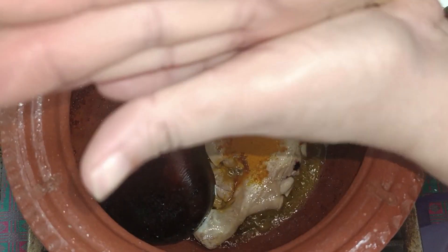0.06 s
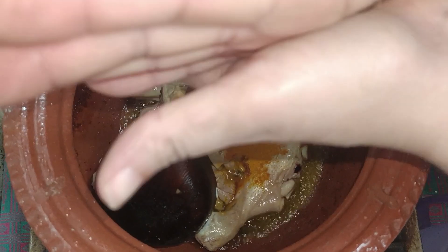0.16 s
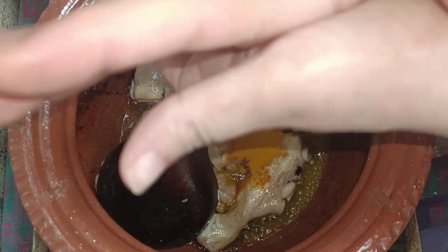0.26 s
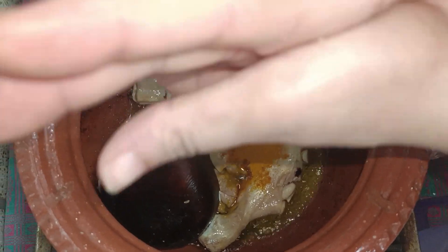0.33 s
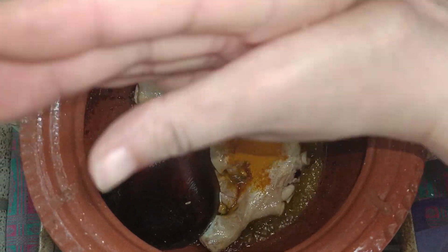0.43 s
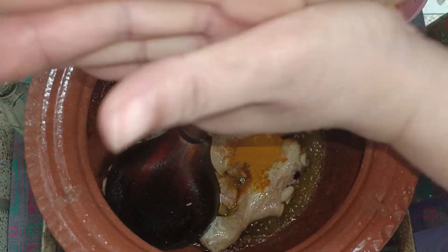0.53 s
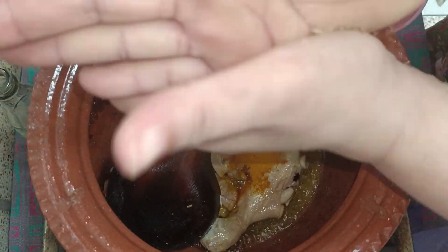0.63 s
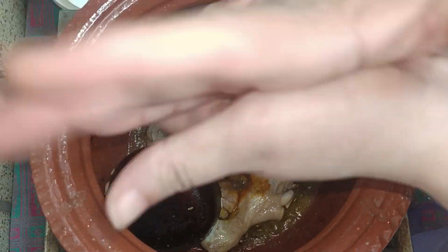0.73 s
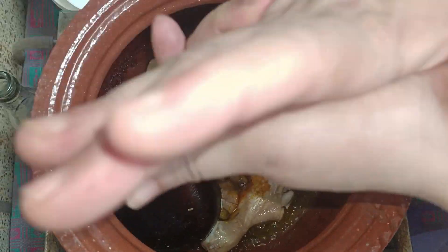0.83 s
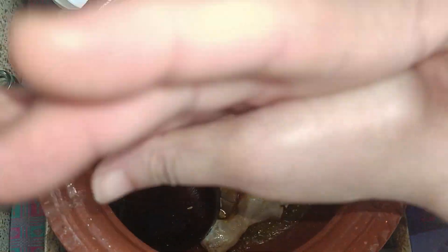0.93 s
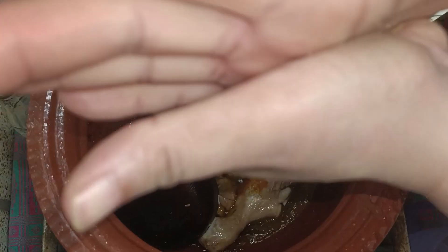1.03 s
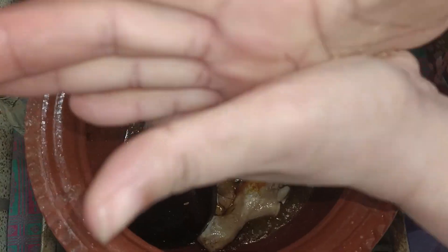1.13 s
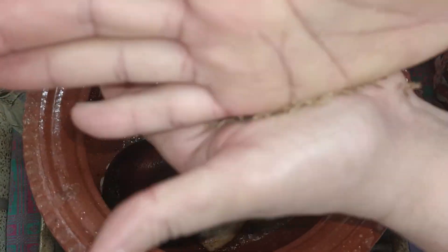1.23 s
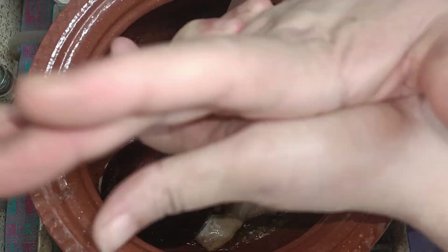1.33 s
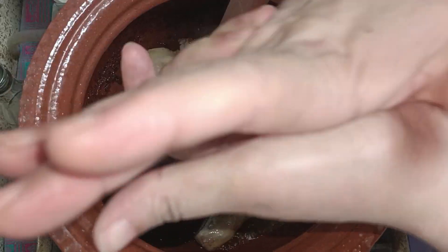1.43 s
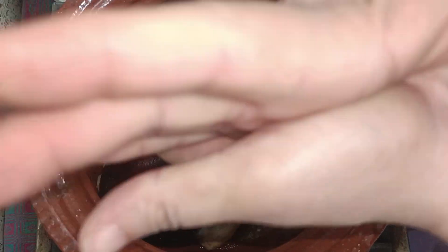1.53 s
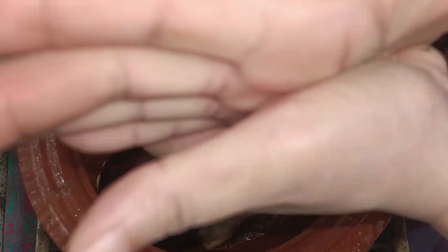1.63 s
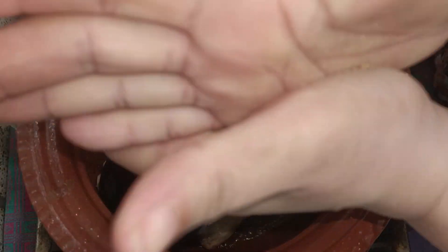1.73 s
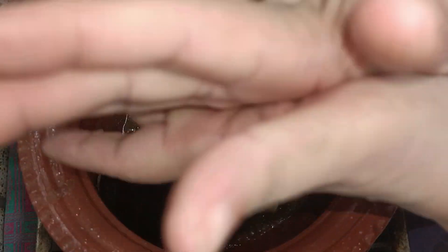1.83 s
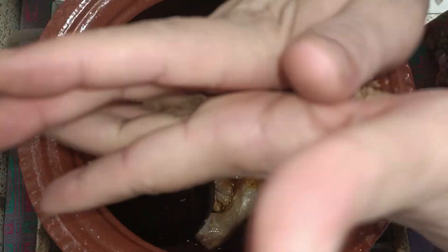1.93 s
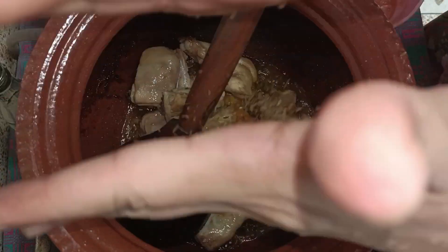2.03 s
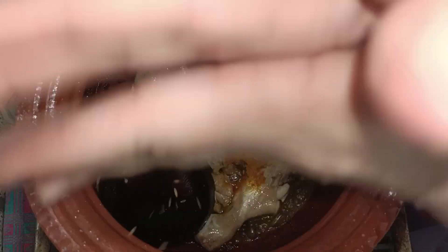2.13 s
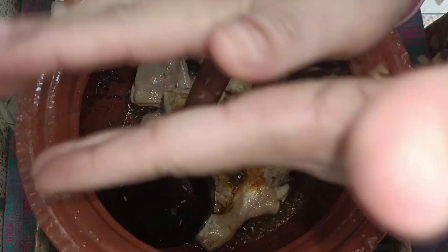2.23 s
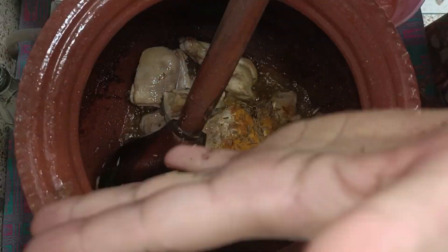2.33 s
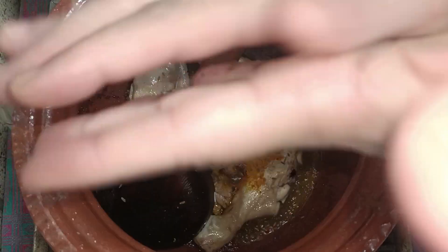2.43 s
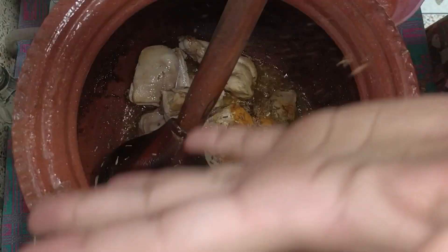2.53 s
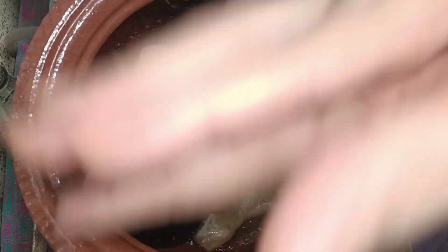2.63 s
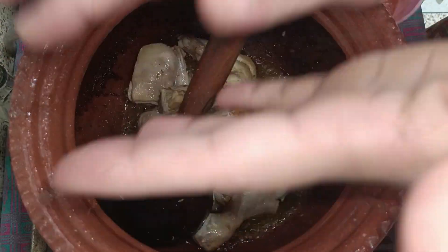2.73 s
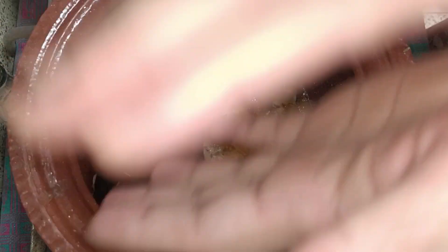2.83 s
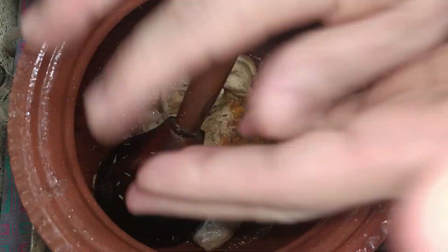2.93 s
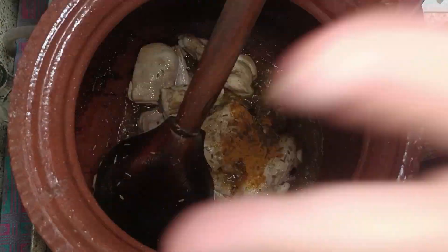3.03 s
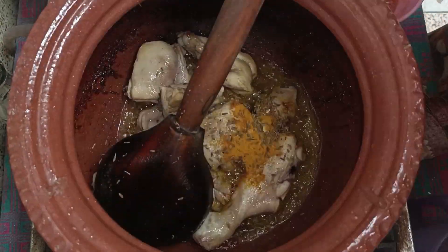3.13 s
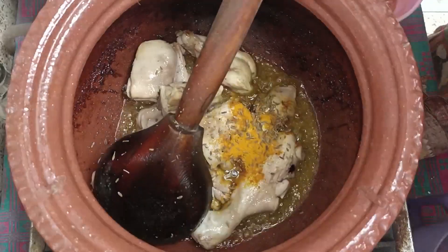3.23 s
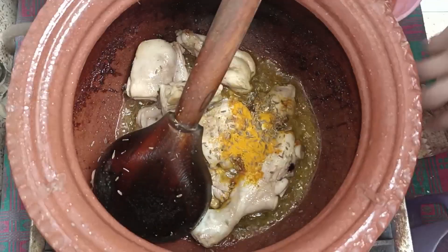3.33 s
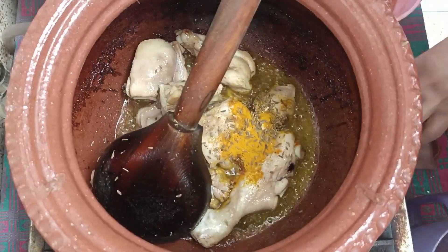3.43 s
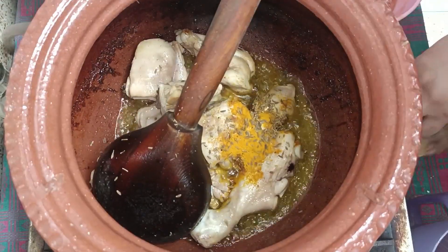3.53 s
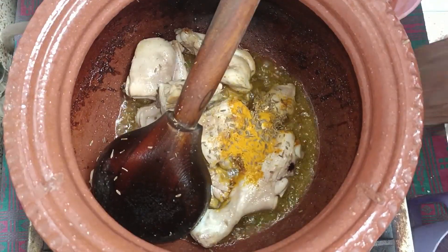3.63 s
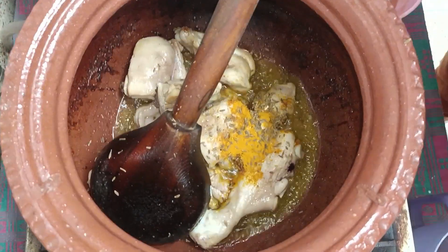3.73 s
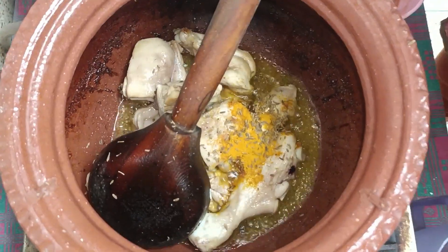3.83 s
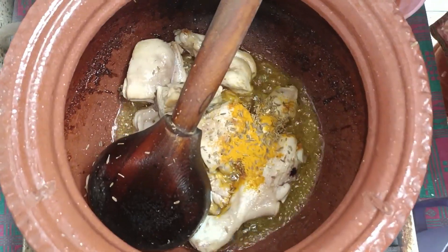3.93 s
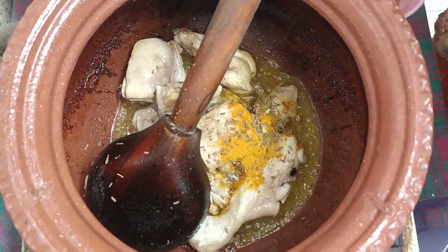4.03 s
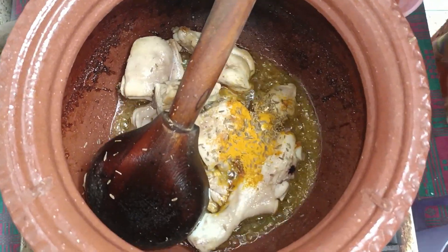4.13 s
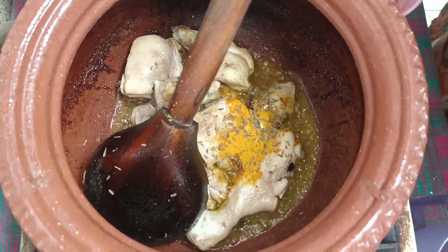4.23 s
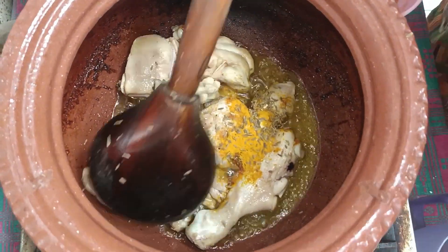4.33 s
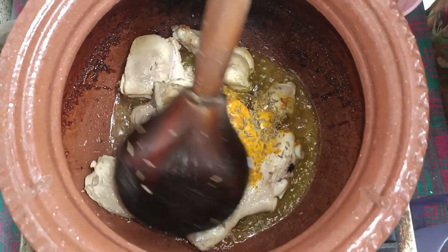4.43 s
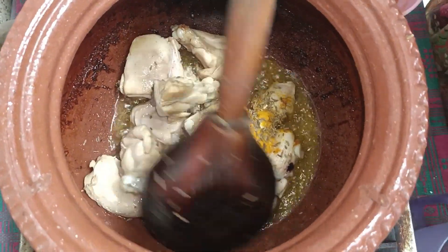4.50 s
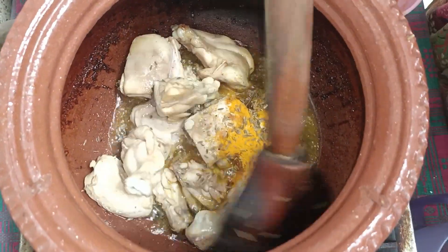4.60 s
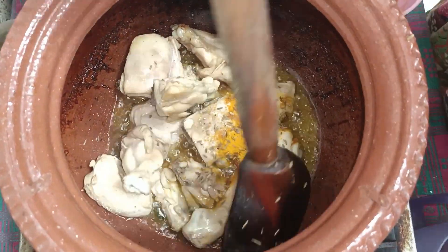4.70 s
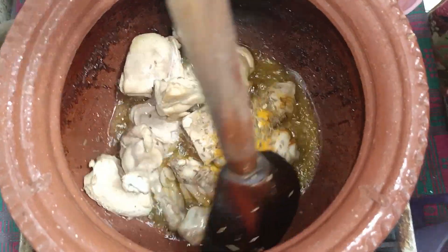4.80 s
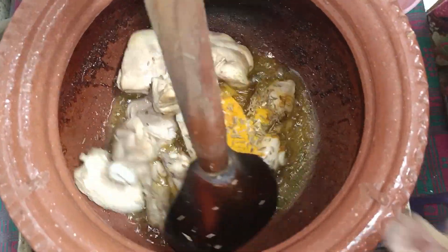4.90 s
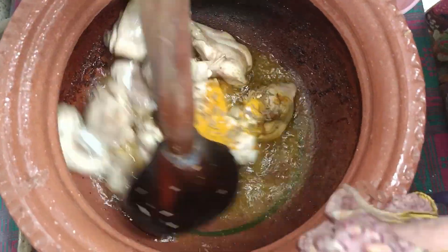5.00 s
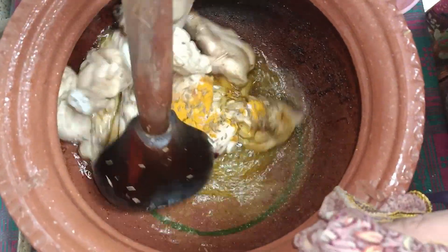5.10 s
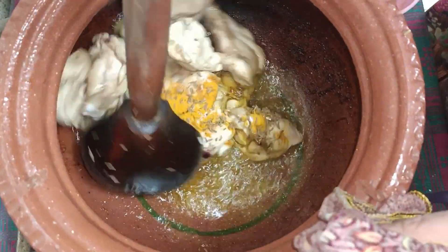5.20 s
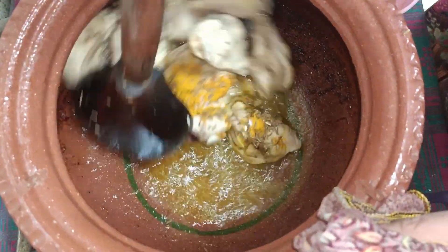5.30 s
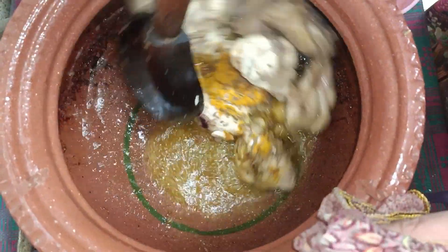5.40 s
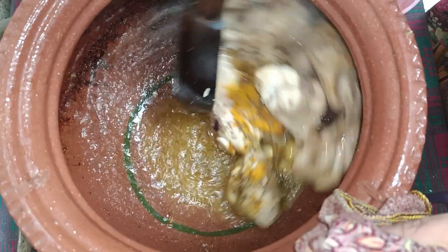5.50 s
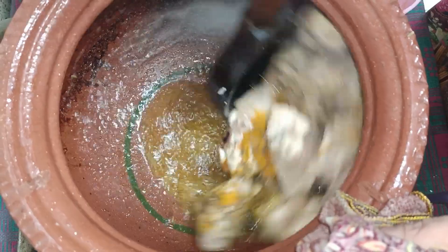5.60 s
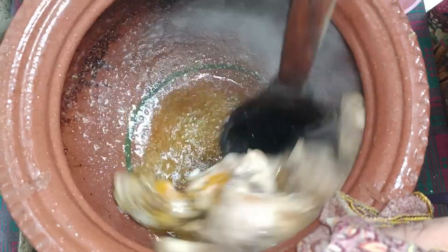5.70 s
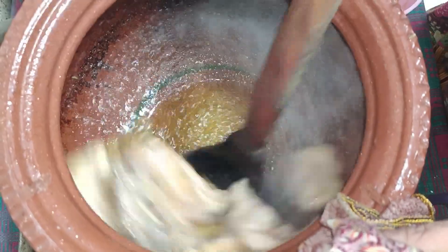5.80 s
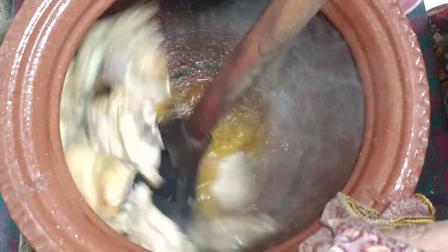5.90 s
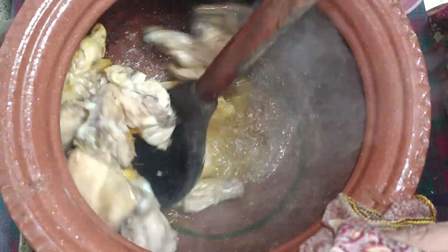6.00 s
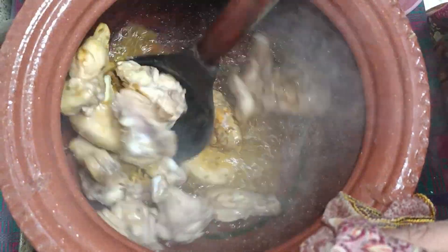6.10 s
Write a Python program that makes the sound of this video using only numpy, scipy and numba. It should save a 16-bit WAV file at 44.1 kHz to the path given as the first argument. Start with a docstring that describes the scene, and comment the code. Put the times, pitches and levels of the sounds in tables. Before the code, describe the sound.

A moderate, grainy sizzle simmers in a resonant clay pot in a quiet kitchen, with pops of fat and soft gurgling. Midway come a crisp slap of palms and a stronger one with a short echo. After a pause of plain frying, a spoon clonks on the pot, drags grittily along its wall, and the sizzle swells to a harsh, spraying hiss. Close stereo phone pickup.

```python
"""Meat sizzles in hot fat in a deep clay pot: random bubble bursts drive noise through the pot's air resonances,
with single spits, thin cracks and a low gurgle on top. Hands dust spice off above it in slaps of damped sines and puffs.
A wooden spoon then knocks the clay (ringing modes), scrapes it (swept noise) and rocks the pot, and the fat flares up
on the bared floor. Filtered noise makes the quiet kitchen; all of it is heard by a phone with two microphones."""
import sys
import numpy as np
from scipy import signal
from scipy.fft import rfft, irfft, next_fast_len
from scipy.io import wavfile
from scipy.ndimage import uniform_filter1d
from numba import njit

SR = 44100
rng = np.random.default_rng(int(sys.argv[2]) if len(sys.argv) > 2 else 0)


def generate_wav(signal):
    """Clip the signal to [-1, 1] and save it as 16-bit WAV at the path in sys.argv[1]."""
    frames = np.transpose(np.atleast_2d(signal))
    scaled = np.clip(frames, -1, 1) * 32767
    pcm = np.round(scaled).astype(np.int16)
    wavfile.write(sys.argv[1], SR, pcm)


def field_ratio(decibels):
    """Amplitude ratio for a level in dB (20 dB per decade); scalars and array-likes work."""
    return 10 ** (np.asarray(decibels, dtype=float) / 20)


N = 271215
T = np.arange(N) / SR


def curves(table):
    """Columns of a table against its first one, time, as one value a sample."""
    s, *columns = np.transpose(table)
    return [np.interp(T, s, c) for c in columns]


def unit(x):
    """Scaled to rms 1."""
    return x / np.sqrt(np.mean(x ** 2))


def pan(db):
    """Left and right gains for a left minus right level difference."""
    return field_ratio(np.array([db, -db]).reshape(2, -1) / 2)


def above(x, hz):
    """Steep high-pass."""
    return signal.sosfilt(signal.butter(4, hz, "highpass", fs=SR, output="sos"), x)


def ring(x, hz, width):
    """A resonance applied twice, so the valleys beside it stay dark."""
    b, a = signal.iirpeak(hz, hz / width, SR)
    return signal.lfilter(b, a, signal.lfilter(b, a, x))


@njit
def sweep(x, hz, width):
    """State-variable band-pass whose centre moves."""
    y, band, low = np.empty(len(x)), 0., 0.
    for i in range(len(x)):
        g = np.tan(np.pi * hz[i] / SR)
        k = width / hz[i]
        v = (band + g * (x[i] - low)) / (1 + g * (g + k))
        band = 2 * v - band
        low = low + 2 * g * v
        y[i] = k * v
    return y


def walk(rate):
    """Random levels held 1 / rate s and slewed twice; spread 1."""
    k = int(SR / rate)
    held = np.repeat(rng.standard_normal(N // k + 1), k)
    return unit(uniform_filter1d(uniform_filter1d(held, k), k)[:N])


def fade(power, ms):
    """Each spike of power dies away exponentially, by a factor e in ms."""
    return signal.lfilter([1], [1, -np.exp(-1000 / (ms * SR))], power)


def bursts(rate, spread_db, ms):
    """Power of bubbles bursting at random, rate a second, many small and a few large; mean 1."""
    when, size = rng.random(N), rng.exponential(size=N)
    strength = field_ratio(np.minimum(spread_db * size, 17)) ** 2
    power = fade((when < rate / SR) * strength, ms)
    return power / power.mean()


def decay(s, hz, t60):
    """A damped sine from time s that builds up over its first cycle."""
    t = np.clip(T - s, 0, None)
    return np.sin(2 * np.pi * hz * t) * (1 - np.exp(-2 * hz * t)) * np.exp(-np.log(1000) * t / t60)


def swells(table):
    """Amplitude of sounds that rise, hold for their length and die away."""
    attack_s, release_db_per_s = 0.0075, 400
    power = 0
    for s, length, db, *_ in table:
        rise = np.clip((T - s) / attack_s, 0, 1)
        fall_db = release_db_per_s * np.clip(T - s - length, 0, 1)
        power = power + (rise * field_ratio(db - fall_db)) ** 2
    return np.sqrt(power)


# Air resonances of pot and phone. Each row: centre in Hz, width of one pass in Hz, gain in dB for the simmer,
# gain in dB for the flare, left minus right in dB, likeness of the two microphones from 0 to 1.
POT_AIR = [(1325, 290, -19, 0.5, -1.5, 0.53), (1745, 191, 3, 1, -2, 0.75), (2090, 550, -10.5, 0, -8, 0.37),
           (2500, 544, 1, 1.5, 3, 0.7), (2820, 1310, -2, -2, 2.5, 0), (3367, 300, -7, -1.5, -9, 0),
           (3940, 690, 1, 1.5, 0.5, 0), (4458, 850, -1, -0.5, 9, 0.24), (5394, 1570, -11, -4.5, 3.5, 0.11),
           (6630, 1700, -20, -10.5, -2, 0.08), (7910, 2270, -17.5, -5, -8.5, 0),
           (10380, 2270, -24.5, -10.5, 12.5, 0), (12650, 5300, -25, -8.5, 3.5, 0),
           (14670, 3100, -23, -5, 4.5, 0)]
# Steady frying; the deep note fades once the spoon is lifted. Each row: time in seconds, level in dB,
# deep pot note in dB (added to the resonances under 1900 Hz).
SIMMER = [(0, -39, -5), (.5, -41, -1), (1.1, -41.5, -8.5), (1.7, -42, -3.5), (2.3, -41, -3),
          (2.9, -41.5, -2.5), (3.6, -39.5, -1.5), (4.4, -39.5, 1), (4.7, -39, -16), (4.95, -39.5, -12)]


def frying():
    """Bursting bubbles excite the air of the pot; each resonance hears broad cracks and bubbles of its own."""
    simmer_db, deep_db = curves(SIMMER)
    deep_db = deep_db + 2.27 * walk(6.96)
    # hands over the pot shade the treble from the right microphone, then move off
    hands_off_s = 3.2
    shade_db = np.interp(T, [hands_off_s - 0.15, hands_off_s + 0.14], [4.5, 0.5])
    spray_db, coarse_db = flare()
    broad = bursts(rate=150, spread_db=3.2, ms=1.2)
    thin = fade(cracks(), 0.61)
    s, spit_db, spit_hz, spit_pan = spits(np.maximum(simmer_db, coarse_db))
    out = 0
    for hz, width, calm_db, hot_db, pan_db, like in POT_AIR:
        treble = np.clip(np.log2(hz / 4830), 0, 1)
        share = 0.15 + 0.21 * treble
        grain = share * broad + (1 - share) * bursts(rate=900, spread_db=1, ms=3.3)
        calm = field_ratio(simmer_db + calm_db + (hz < 1900) * deep_db + 1.47 * walk(27.996)) ** 2 * grain
        # the flare is so dense that its grains partly merge into hiss
        flare_db = treble * spray_db + (1 - treble) * coarse_db
        hot = field_ratio(flare_db + hot_db + 1.62 * walk(12)) ** 2 * (0.42 + 0.35 * grain)
        # a spit is loudest in the resonances near its pitch
        near_db = np.maximum(-14 * np.log2(hz / spit_hz) ** 2, -12)
        spit = np.zeros((2, N))
        spit[:, (s * SR).astype(int)] = (field_ratio(spit_db + calm_db + near_db) * pan(spit_pan)) ** 2
        power = (calm + hot) * pan(pan_db + treble * shade_db) ** 2 + fade(spit, 3.85)
        power = power + treble * thin * (field_ratio(calm_db) * pan(pan_db)) ** 2
        both, left, right = rng.standard_normal((3, N))
        noise = np.sqrt(like) * both + np.sqrt(1 - like) * np.array([left, right])
        # food and spoon shift a little, so every resonance wavers
        centre_hz = hz + 30 * walk(7)
        rung = [sweep(sweep(x, centre_hz, width), centre_hz, width) for x in noise * np.sqrt(power)]
        out = out + np.array(rung) * np.sqrt(SR / 1500)
    return floor_echo(out)


def floor_echo(sizzle):
    """The echo from the pot floor thins two neighbouring wavering bands, ever less from 4.2 to 4.9 s."""
    depth = np.clip(5.1 - T, 0.2, 0.9)
    for hz in (1960, 2110):
        notch_hz = hz * (1 + 0.047 * walk(25.05))
        sizzle = sizzle - depth * np.array([sweep(x, notch_hz, 295.0) for x in sizzle])
    return sizzle


# Colour of the room noise. Each row: frequency in Hz, relative density in dB per Hz.
KITCHEN_COLOUR = [(12, -53), (20, -29), (69, -12), (136, -2.5), (237, -3), (270, -6), (303, -4.5),
                  (406, -1.5), (448, 3.5), (495, -6.5), (892, -14), (1000, -21), (1300, -40), (2200, -120)]
# Its balance. Each row: frequency in Hz, left minus right in dB.
KITCHEN_PAN = [(40, 3), (150, -1.5), (430, 3.5), (600, -4.5), (800, -7)]


def kitchen():
    """Low room noise and burner roar, nearly the same on both microphones in the bass."""
    size = next_fast_len(N)
    hz = np.maximum(np.fft.rfftfreq(size, 1 / SR), 1)
    colour_db, pan_db = (np.interp(np.log(hz), np.log(np.array(t)[:, 0]), np.array(t)[:, 1])
                         for t in (KITCHEN_COLOUR, KITCHEN_PAN))
    both, left, right = rfft(rng.standard_normal((3, size)), axis=1)
    apart = np.clip(hz / 610, 0.3, 3)
    air = (both + apart * np.array([left, right])) / np.sqrt(1 + apart ** 2)
    roar = irfft(air * field_ratio(colour_db) * pan(pan_db), size)[:, :N]
    return unit(roar) * field_ratio(-64 + 0.99 * walk(5.22))


# Runs of large bubbles under the spoon bowl. Each row: start in seconds, length in seconds, level in dB.
GURGLES = [(.02, 0.31, -57), (.55, 0.2, -56.5), (3.84, 0.069, -57.5), (4.0, 0.054, -51.5), (4.42, 0.2, -55)]


def gurgle():
    """Large bubbles ring one low hollow of the pot, heard somewhat more on the right."""
    bubbles = rng.standard_normal((2, N)) * np.sqrt(bursts(rate=150, spread_db=3, ms=5))
    idle = field_ratio(-69.5)
    under_flare = field_ratio(flare()[1] - 10.5)  # follows the coarse sizzle
    return unit(ring(bubbles, 1098.5, 68)) * (idle + swells(GURGLES) + under_flare) * pan(-5)


# Single spits of fat. Each row: time in seconds, level in dB before the pot's air, pitch in Hz,
# left minus right in dB.
SPITS = [(0.2753, -29.5, 2500, -2), (.29, -34, 1600, -6), (.3735, -33.5, 4060, -2), (0.682, -36, 4380, 12),
         (1.289, -35, 4500, 11), (2.1784, -31.5, 2400, 7), (2.6683, -33.5, 2500, 0), (2.909, -30, 4450, 5),
         (2.9886, -35, 4270, 6), (3.6022, -33, 4350, -5), (4.2163, -30.5, 4350, 0),
         (4.366, -33.5, 2530, -4), (5.0842, -28, 2550, -3), (5.1134, -22, 1880, -4)]


def spits(frying_db):
    """Single spits of fat, and 24 more at random times whose level follows the frying."""
    count = 24
    at = rng.integers(0, N, count)
    level_db = frying_db[at] - 1.5 + 6 * (rng.random(count) - 0.5)
    pitch_hz = rng.choice([2500, 4340], count)
    pan_db = 3 + 14 * (rng.random(count) - 0.5)
    return np.hstack([np.transpose(SPITS), [at / SR, level_db, pitch_hz, pan_db]])


# Thin treble cracks: spraying fat, and the sharp edge of the two hand slaps at 2.465 and 2.7176 s.
# Each row: time in seconds, level in dB before the pot's air.
CRACKS = [(.3711, -27), (1.034, -27), (1.4194, -26), (1.695, -25), (2.465, -24), (2.7176, -18.5),
          (2.831, -33), (2.9307, -23), (3.018, -23.5), (3.6026, -27), (3.7105, -22), (4.276, -19.5),
          (4.8688, -25), (4.9561, -22), (5.0529, -19)]


def cracks():
    """Single spikes of power for thin treble cracks: 16 at random times and the listed ones."""
    count, power = 16, np.zeros(N)
    random_db = -37.5 + 9.7 * (rng.random(count) + 0.5)
    power[rng.integers(0, N, count)] = field_ratio(random_db) ** 2
    s, db = np.transpose(CRACKS)
    power[(s * SR).astype(int)] = field_ratio(db) ** 2
    return power


# Palms and fingers meeting. Each row: time in seconds, skin level in dB, hollow level in dB.
SLAPS = [(2.4622, -19, -51), (2.465, -8.5, -39), (2.7146, -9.5, -23), (2.7154, -11, -14.5),
         (2.7181, -9, -3.5)]
# Modes of the skin. Each row: pitch in Hz, relative level in dB, t60 in ms, left minus right in dB.
PALMS = [(2020, -9, 6.4, -14.5), (2600, -4, 7.2, 3), (3200, -6.5, 8.4, 3), (3870, -7, 5.5, 10)]
# Dull puffs of air, most of them on the right. Each row: start in seconds, level in dB, pitch in Hz, t60 in ms,
# left minus right in dB.
PUFFS = [(2.17, -48, 80, 62, -22), (2.458, -45, 98.5, 100, -19), (2.463, -41, 237, 47, -18),
         (2.7128, -21, 182, 15, -20), (2.79, -52, 86.5, 200, -19), (4.562, -36.5, 101, 90, -8),
         (4.639, -39, 141, 82, -0.5)]


def hands():
    """Slaps of cupped palms with a short hollow echo from pot and kitchen, and the air they push."""
    lag = np.array([[0.00025], [0]])  # seconds; the left microphone is further from the hands
    skin, hollow, puffs = 0, 0, 0
    for s, skin_db, hollow_db in SLAPS:
        for hz, mode_db, ms, pan_db in PALMS:
            skin = skin + field_ratio(skin_db + mode_db) * pan(pan_db) * decay(s + lag, hz, ms / 1000)
        # air between the palms
        hollow = hollow + field_ratio(hollow_db) * pan(-7.5) * decay(s + lag, 970, 6.9 / 1000)
    slaps = above(skin, 1500) + hollow
    t = T[:SR // 4]
    echo = rng.standard_normal((2, len(t))) * np.exp(-(t / 0.055) ** 2) * (t > 0.004)
    tail = signal.fftconvolve(ring(slaps, 650, 900), echo, axes=1)[:, :N]
    for s, db, hz, ms, pan_db in PUFFS:
        puffs = puffs + field_ratio(db) * pan(pan_db) * decay(s, hz, ms / 1000)
    return above(slaps + field_ratio(-41) * tail, 370) + puffs


# Modes of the pot wall. Each row: pitch in Hz, relative level in dB, t60 in seconds.
CLAY = [(369.6, -5, 0.13), (457, -0.5, 0.058), (545, -12.5, 0.12), (718, -2, 0.16), (920, -32, 0.03),
        (1106, -17, 0.17), (1300, -2, 0.04), (1836, -3, 0.045), (2340, -1, .045), (2860, -4, .045)]


def clay(force):
    """The pot wall rings with its modes."""
    t = T[:SR // 2]
    body = sum(field_ratio(db) * np.sin(2 * np.pi * hz * t) * np.exp(-np.log(1000) * t / t60) for hz, db, t60 in CLAY)
    return signal.fftconvolve(force, body[None], axes=1)[:, :N]


# Spoon on clay. Each row: time in seconds, push on the clay in dB, contact in ms, spoon level in dB,
# left minus right in dB.
KNOCKS = [(4.6894, -23, 0.2, -36, 3), (4.701, -32.5, 0.24, -36, 13), (4.745, -39, 0.52, -50, 5),
          (5.102, -47, 0.31, -52, -10), (6.1246, -48, 0.22, -18, 2)]
# Modes of the wooden spoon. Each row: pitch in Hz, relative level in dB, t60 in seconds.
SPOON = [(555, -2, 0.035), (1420, 1, 0.015)]


def knocks():
    """Short pushes ring clay and spoon over a dull thud of noise."""
    force, wood, blows = 0, 0, np.zeros((2, N))
    for s, db, ms, wood_db, pan_db in KNOCKS:
        push = np.exp(-((T - s) * 2000 / ms) ** 2)
        force = force + field_ratio(db) * pan(pan_db) * push / push.sum()
        blows[:, int(s * SR)] = (field_ratio(db) * pan(pan_db))[:, 0] ** 2
        for hz, mode_db, t60 in SPOON:
            wood = wood + pan(pan_db) * field_ratio(wood_db + mode_db) * decay(s, hz, t60)
    thud = field_ratio(11.5) * ring(rng.standard_normal(N) * np.sqrt(fade(blows, 5.6)), 540, 830)
    return above(clay(force) + wood + thud, 270)


# Strokes of the spoon along the clay. Each row: start in seconds, length in seconds, level in dB, hum pitch in Hz.
STROKES = [(4.712, 0.059, -43, 405), (4.99, 0.082, -49.5, 438), (5.097, 0.083, -41.5, 414),
           (5.369, .11, -47, 445), (5.534, 0.033, -40.5, 460), (5.6, .09, -52.5, 353),
           (5.803, .08, -53.5, 435), (5.914, 0.24, -44.5, 433)]
# Gritty rasps of the spoon's edge. Each row: start in seconds, length in seconds, level in dB.
RASPS = [(4.8, 0.053, -55), (5.45, .08, -47.5), (5.56, 0.14, -52), (5.73, 0.18, -49), (5.97, 0.34, -49)]


def drag():
    """The spoon slips along the clay in bursts of noise that hum in the pot's hollow under a gritty rasp."""
    start, length, _, hz = np.transpose(STROKES)
    hum_hz = np.interp(T, start + length / 2, hz)
    slips = rng.standard_normal((3, N)) * np.sqrt(bursts(rate=130, spread_db=1, ms=13))
    slips = slips[0] + 0.92 * slips[1:]  # shared part and each microphone's own
    hum = np.array([sweep(sweep(x, hum_hz, 86.0), hum_hz, 91.0) for x in above(slips, 190)])
    rasp = ring(slips, 665, 330)
    return unit(hum) * swells(STROKES) * pan(4.2) + unit(rasp) * swells(RASPS) * pan(-11)


# The pot rocking on the stove. Each row: start in seconds, length in seconds, level in dB.
ROCKS = [(4.72, 0.1, -46), (4.88, 0.06, -51), (5.32, .08, -58), (5.63, 0.089, -57), (5.85, .04, -54),
         (5.91, 0.095, -49)]


def rocking():
    """The pot rumbles on the stove: low resonant noise, much alike on both microphones."""
    shake = rng.standard_normal((3, N))
    rumble = ring(shake[0] + 0.22 * shake[1:], 136, 99)
    return unit(rumble) * swells(ROCKS) * pan(-0.51)


# Fat flaring on bare clay. Each row: time in seconds, fine spray in dB, coarse sizzle in dB.
FLARE = [(4.9, -59.5, -51), (5.06, -44, -39), (5.2, -40.5, -34), (5.34, -35.5, -30.5), (5.48, -32.5, -29.5),
         (5.63, -28.5, -30), (5.76, -28, -33), (5.95, -31, -33), (6.15, -32, -33.5)]


def flare():
    """Spray and sizzle levels in dB, practically silent before the spoon bares the clay."""
    return [np.where(T < FLARE[0][0], -120, db) for db in curves(FLARE)]


def scene():
    """All sources at the two microphones; bubbles are too small for bass, blows lose their deepest bass."""
    fat = above(frying() + gurgle(), 760)
    blows = above(hands() + knocks() + drag() + rocking(), 33)
    return fat + blows + kitchen()


def roll_off(x):
    """The treble ends steeply here."""
    return signal.sosfilt(signal.butter(12, 15730, fs=SR, output="sos"), x)


def record(dry):
    """The finished mix as the phone stores it."""
    return roll_off(dry)


dry = scene()
out = record(dry)
generate_wav(out)
```